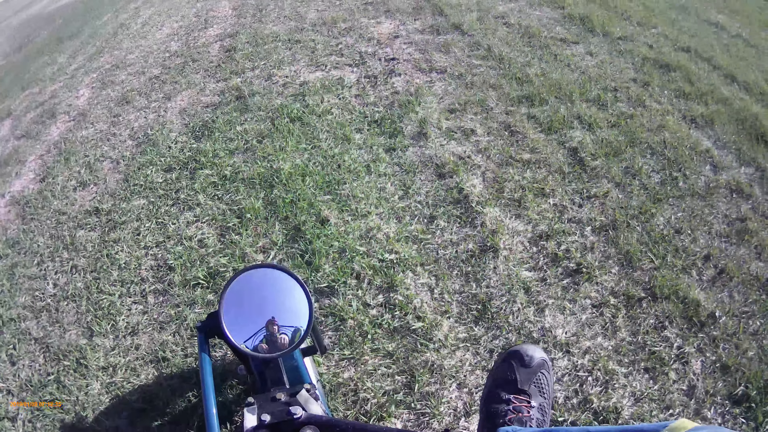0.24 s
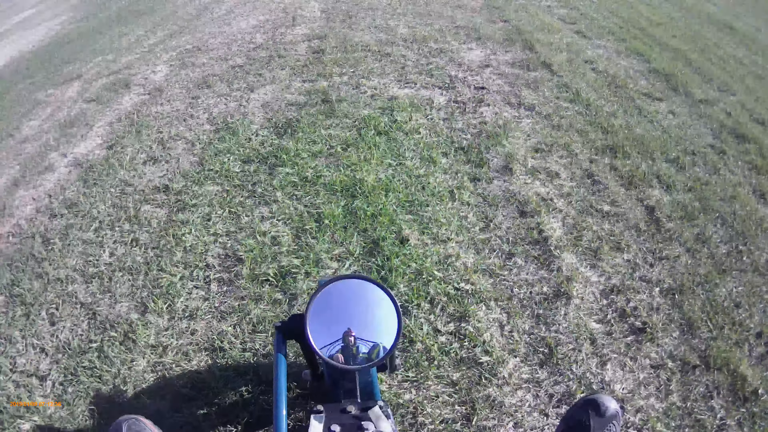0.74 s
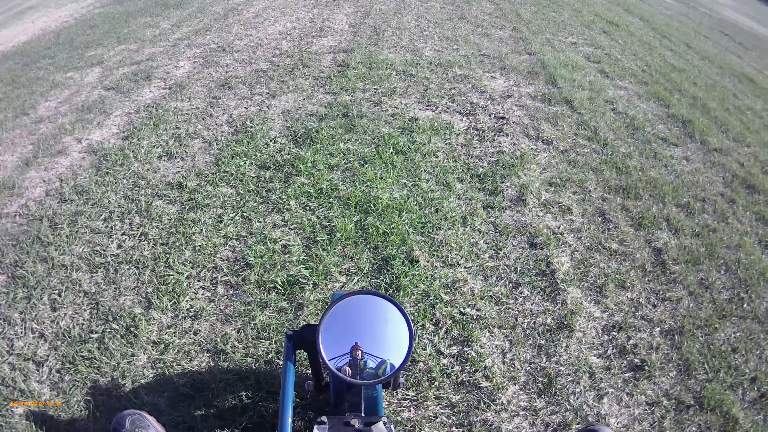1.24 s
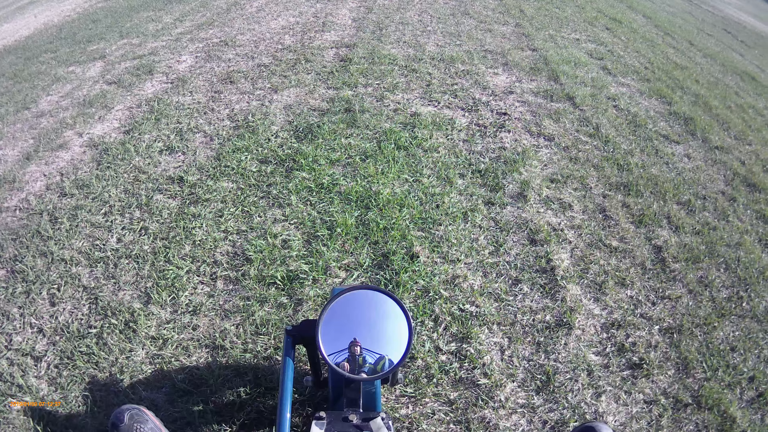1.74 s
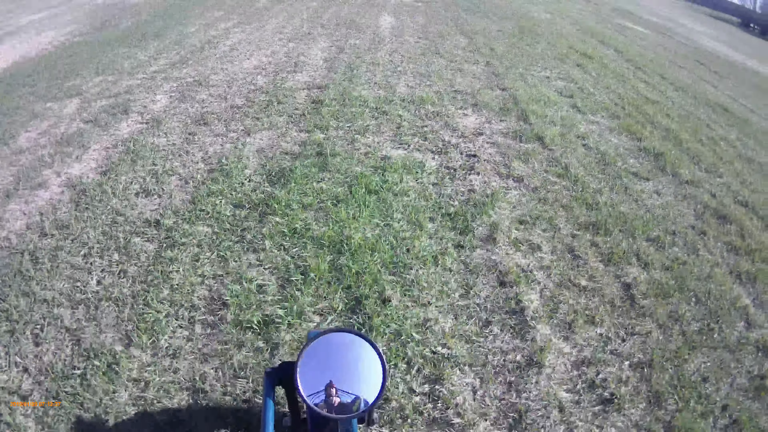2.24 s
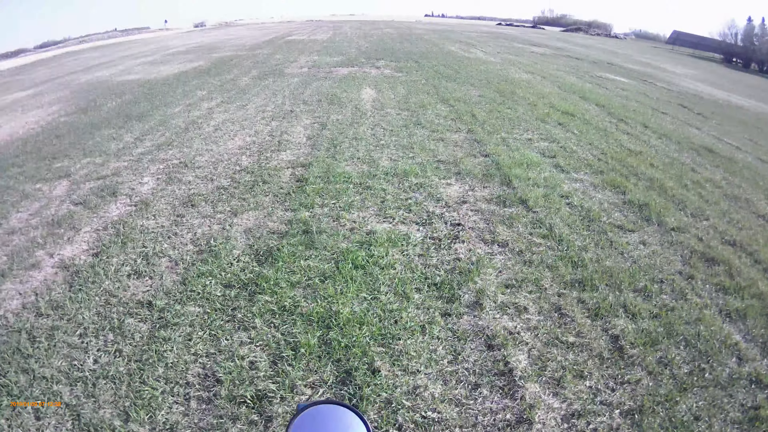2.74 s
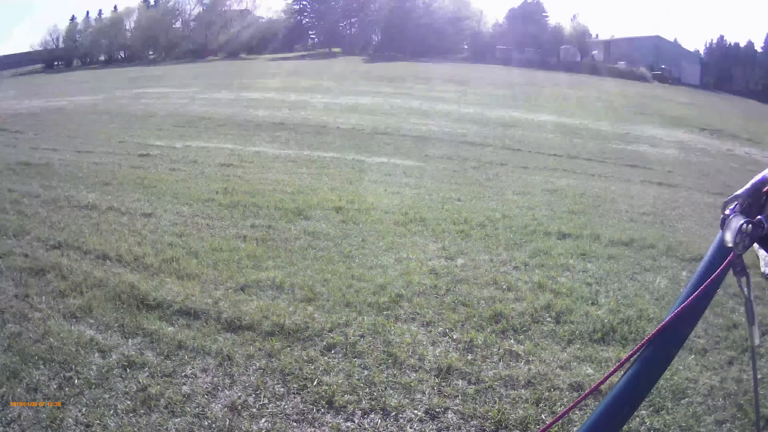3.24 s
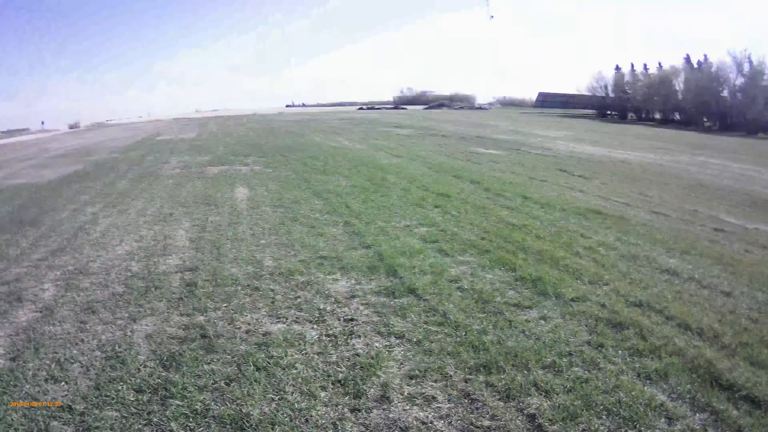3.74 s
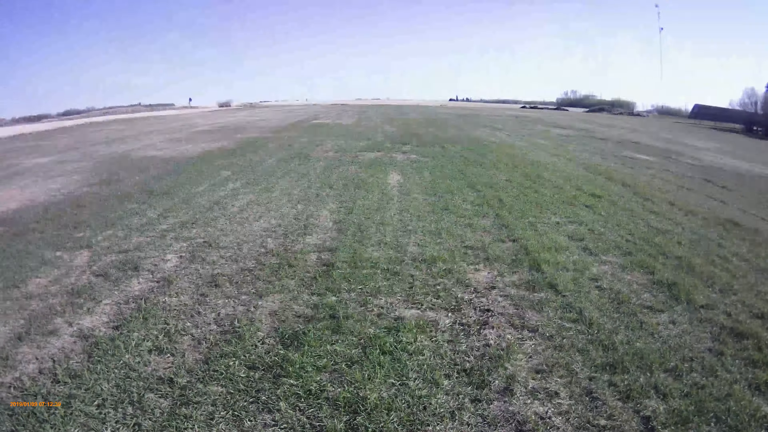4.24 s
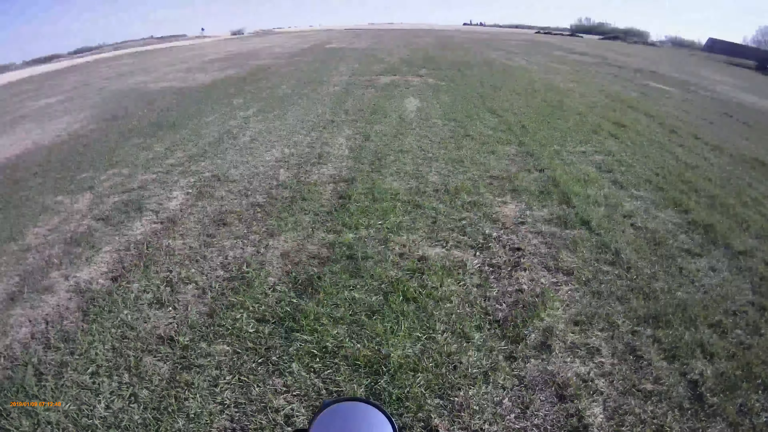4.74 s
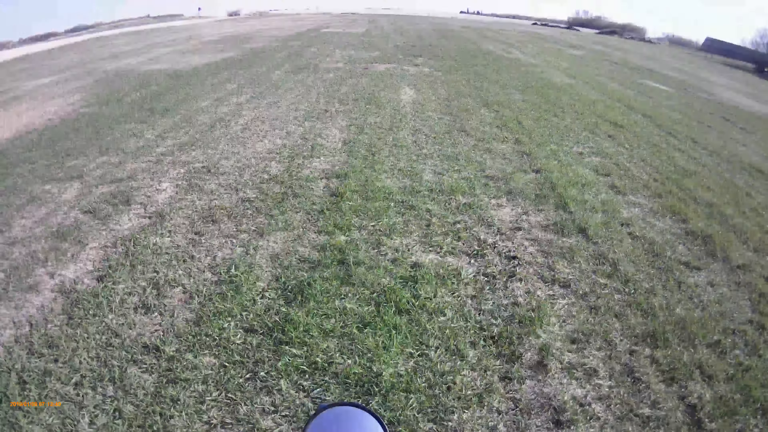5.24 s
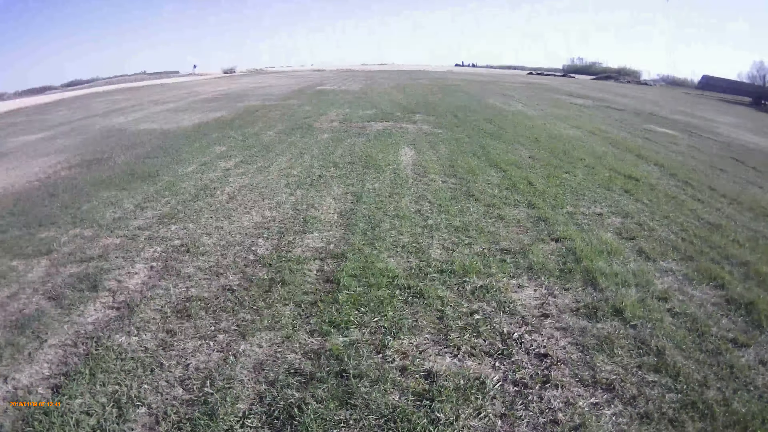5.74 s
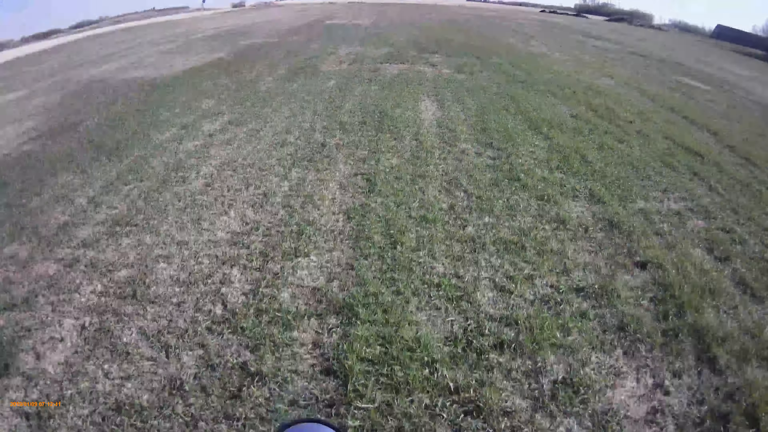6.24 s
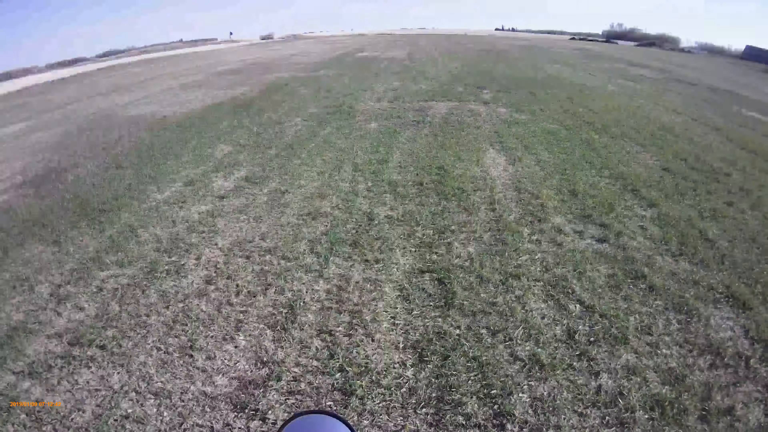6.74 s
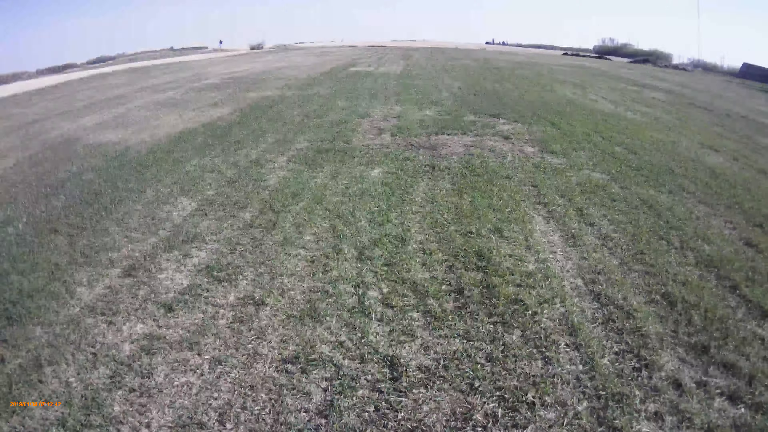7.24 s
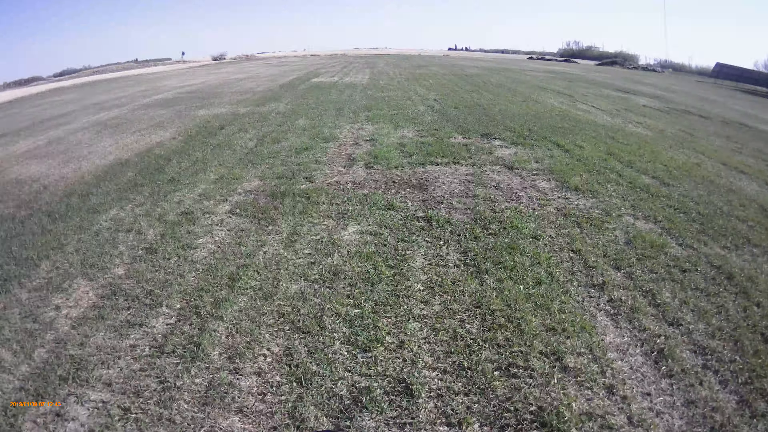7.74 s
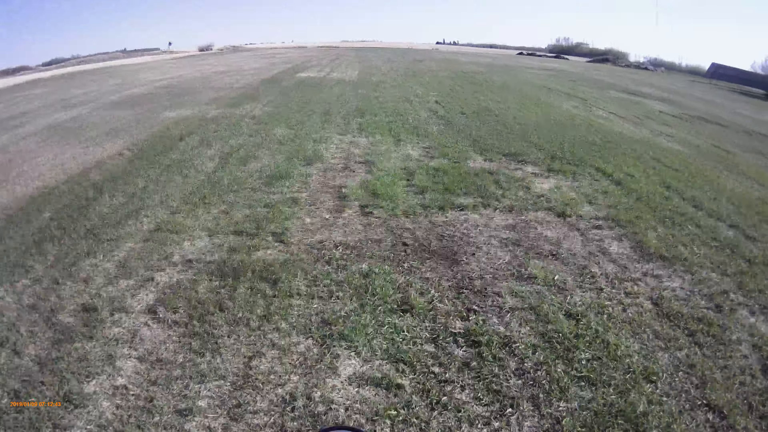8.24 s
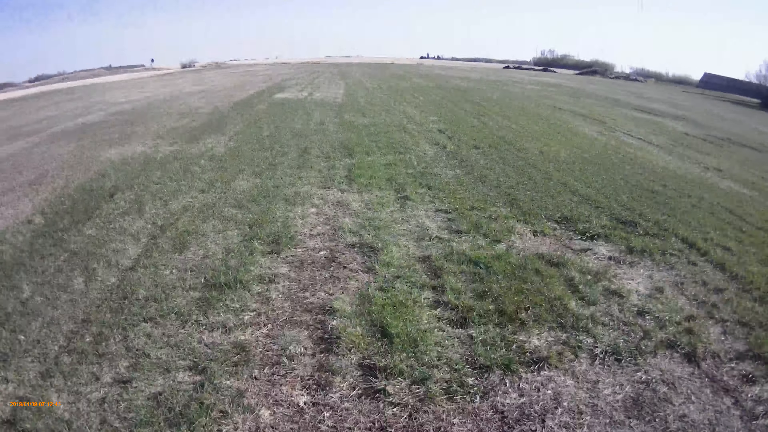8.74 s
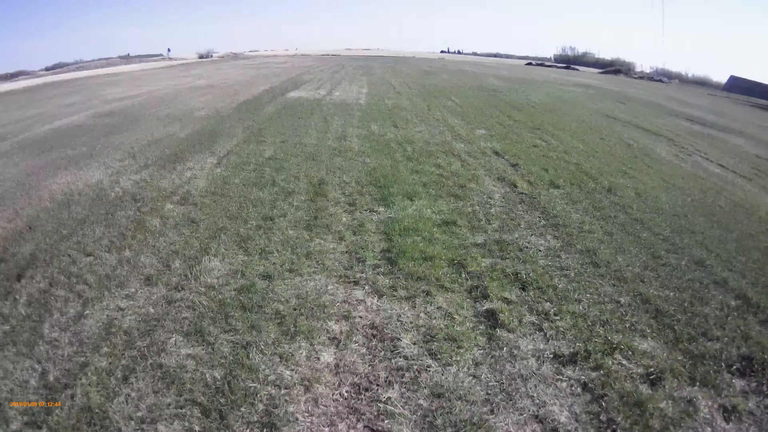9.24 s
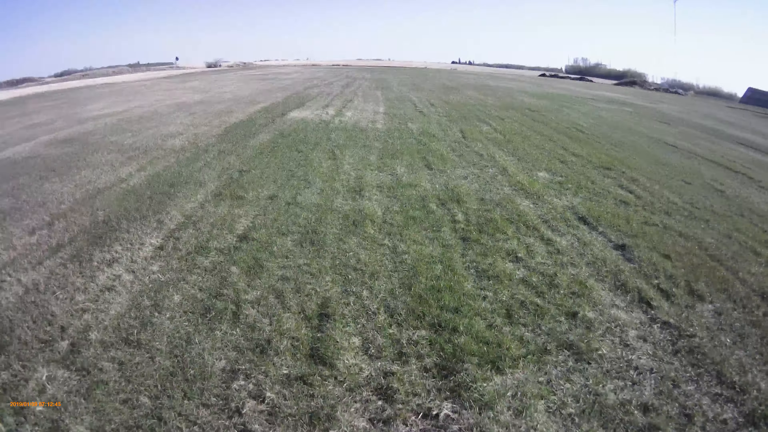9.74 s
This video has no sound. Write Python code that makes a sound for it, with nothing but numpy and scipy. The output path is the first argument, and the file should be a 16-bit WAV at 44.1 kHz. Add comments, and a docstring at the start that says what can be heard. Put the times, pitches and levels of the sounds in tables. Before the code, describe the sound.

A small two-stroke aircraft engine is heard close up from the seat of a powered parachute, outdoors on grass. For the first 2.5 seconds it idles with a lumpy throb and uneven gear clatter, with sharp metallic knocks right at the start and at about 2.2 seconds. Near 2.6 seconds the throttle is nudged: the pitch lifts slightly and the rattle smooths out. From about 3.6 seconds the engine revs up, snarling and growing much louder until it reaches full speed around 5.5 seconds. The exhaust drones, with a rasping propeller buzz and a pulsing hiss of air from the blades. At about 6.2 seconds the engine stumbles, dipping briefly in pitch, then recovers and holds a loud, steady drone until the end, near 10 seconds. A few very faint, dull bumps from the cart rolling over turf lie beneath it between 4 and 7 seconds.

```python
"""A two-stroke twin idles with a rattling gearbox: a powered parachute on a grass strip, heard from the seat.
It is nudged up, then opened to a loud drone that stumbles once. The exhaust sings mostly on the even
shaft orders, a geared three-blade propeller adds its own row of lines, and pulsing gas and blade
noise rings the frame. The cart jolts dully over the turf."""
import sys
import numpy as np
from scipy import signal
from scipy.fft import rfft, irfft, next_fast_len
from scipy.io import wavfile
from scipy.ndimage import uniform_filter1d

SR = 44100
rng = np.random.default_rng(int(sys.argv[2]) if len(sys.argv) > 2 else 0)


def file_out(sig):
    """Save sig as 16-bit WAV at sys.argv[1]."""
    # one column per channel
    cols = np.atleast_2d(sig).T
    # limit, then scale
    lim = np.clip(cols, -1, 1)
    pcm = np.round(lim * 32767).astype(np.int16)
    wavfile.write(sys.argv[1], SR, pcm)


N = 440559
TIME_S = np.arange(N) / SR
FULL_HZ, LOADED_HZ, IDLE_HZ = 100, 37.75, 33.8  # shaft rates: full speed, gears tight, gears slack


def undb(db):
    """Decibels to gain."""
    return 10 ** (np.asarray(db) / 20)


def unit(x):
    """Scale to rms 1."""
    return x / np.sqrt(np.mean(x ** 2))


def curve(table):
    """Straight lines through (seconds, value) rows, one value a sample."""
    return np.interp(TIME_S, *np.transpose(table))


def walk(rate_hz):
    """Smooth random drift, rms near 1."""
    count = int(4 * rate_hz * N / SR) + 8
    points = uniform_filter1d(uniform_filter1d(rng.standard_normal(count), size=4), size=3)
    return np.interp(np.arange(N), np.linspace(0, N, count), unit(points))


def colour(x, points):
    """Ring x through a causal response of (Hz, dB) points; rms 1."""
    hz, db = np.transpose(sorted(points))
    size = 2 * next_fast_len(N // 2 + 4096)
    log_hz = np.log(np.arange(size // 2 + 1) * SR / size + 1)
    magnitude = undb(np.interp(log_hz, np.log(hz), db, left=-70, right=-70))
    cepstrum = irfft(np.log(magnitude))
    response = np.exp(2 * rfft(cepstrum[:size // 2], size))
    return unit(irfft(rfft(x, size) * response)[:N])


def puffs(cycles, decay_cycles, scatter_db):
    """An envelope that jumps to a random height once a cycle, then decays."""
    sizes = undb(scatter_db * np.sqrt(3) * rng.uniform(-2.3, 1, size=4096))
    return unit(sizes[cycles.astype(int) % len(sizes)] * np.exp(-(cycles % 1) / decay_cycles))


def line(cycles, flutter, spread=1):
    """A partial, rms near 1, fluttering in the moving air; spread is its start phase range in cycles."""
    angle = 2 * np.pi * (cycles + spread * (rng.random() - .5)) + flutter * walk(11)
    return np.sqrt(2 / (1 + flutter ** 2)) * (1 + flutter * walk(11)) * np.sin(angle)


def harmonics(table, cycles, mid_revs, rolled_s, flutter, spread):
    """Exact multiples whose balance shifts at mid revs and as the cart rolls on."""
    return sum(undb(db + mid_db * mid_revs + db_per_s * rolled_s)
               * line(round(order) * cycles, flutter, spread)
               for order, db, mid_db, db_per_s in table)


# Each row: centre in seconds, half length in seconds, level in dB.
TURF_JOLTS = [(4.058, .09, -63), (4.364, 0.14, -63), (6.101, 0.019, -58), (7.221, 0.08, -67)]

def turf_jolts():
    """Each bump shakes a short swell of low rumble out of the cart."""
    swell = sum(undb(db) * np.exp(-((TIME_S - s) / half_s) ** 2) for s, half_s, db in TURF_JOLTS)
    return swell * colour(rng.standard_normal(N), [(20, -18), (48, -1), (75, -5), (160, -28)])


def rush(turns, passes, firing_share, blade_share):
    """Turbulence: a share pulses with each firing, a share swells and cracks with each passing blade."""
    speed = np.gradient(turns) * SR / FULL_HZ
    firing = puffs(2 * turns, decay_cycles=0.4, scatter_db=1.5)
    from_blade = np.abs((passes + .5) % 1 - .5)
    crack = 0.23 * puffs(passes, decay_cycles=0.13, scatter_db=4.5)
    blade = unit(np.exp(-from_blade / .3) + crack)
    firing_power = firing_share * (1.7 - speed) * (firing ** 2 - 1)
    blade_power = blade_share * speed ** 2 * (blade ** 2 - 1)
    return np.sqrt(np.abs(1 + firing_power + blade_power)) * rng.standard_normal(N)


# Each row: frequency in Hz, relative gain in dB.
CASING_RESPONSE = [(1000, -19.5), (1280, 6), (1450, -18), (1900, -13), (2100, 0.5), (2400, -18.5),
                   (2800, -28), (3250, -6.5), (3600, -24.5), (3900, -10), (4300, -20), (4700, -34.5),
                   (9000, -34)]

def casing_ring(turns, passes):
    """Turbulence rings the engine casing behind the seat."""
    return undb(-50) * colour(rush(turns, passes, firing_share=0.38, blade_share=.05), CASING_RESPONSE)


# Each row: centre in seconds, rise in dB.
GEAR_CLACKS = [(.052, 2.5), (.11, 4), (.187, 2), (.263, 4.5), (.33, 1.5), (.382, 0.5), (.44, 1), (.505, 3),
               (.575, 3), (.645, 3.5), (.7, 4), (.762, 5), (.827, 3.5), (.912, 3.5), (.987, 4), (1.052, 3),
               (1.122, 2.5), (1.18, 3.5), (1.234, 2.5), (1.3, 3.5), (1.357, 2), (1.46, 2.5), (1.522, 3.5),
               (1.598, 3.5), (1.656, 0.5), (1.733, 3.5), (1.797, 3), (1.862, 3), (1.913, 4), (1.982, 3.5),
               (2.043, 1.5), (2.094, 5), (2.15, 4.5), (2.216, 5), (2.287, 3), (2.343, 3), (2.415, 4),
               (2.475, 4.5), (2.541, 4)]

def gear_clacks_db(half_s=0.012):
    """At idle the propeller rocks unevenly against the gear teeth; the clatter swells each time."""
    return sum(db * np.exp(-np.minimum(np.abs(TIME_S - s) / half_s, 10) ** 2) for s, db in GEAR_CLACKS)


# Each row: start in seconds, level in dB.
GEAR_SLAMS = [(.055, -46), (2.193, -49), (2.403, -58)]
# Each row: frequency in Hz, relative gain in dB.
SLAM_RESPONSE = [(700, -20), (1300, 1), (1700, 5), (2200, -5), (2800, -18), (3300, 1), (3900, -9),
                 (4600, -26), (10500, -38)]

def gear_slams(decay_s=0.0078):
    """Gear teeth slam: a sharp, bright knock that dies quickly."""
    blows = sum(undb(db) * (TIME_S > s) * np.exp(-np.minimum(np.abs(TIME_S - s) / decay_s, 20))
                for s, db in GEAR_SLAMS)
    return blows * colour(rng.standard_normal(N), SLAM_RESPONSE)


# Each row: frequency in Hz, relative gain in dB.
RATTLE_RESPONSE = [(25, -35), (48, -3), (100, -1.5), (160, -2.5), (205, 8.5), (310, -0.5), (420, 0.5),
                   (700, -8), (1100, -6), (1330, 0.5), (1720, -3.5), (1950, -22.5), (2750, -34),
                   (3250, -18), (3850, -17), (4400, -29.5), (10000, -34)]

def gear_rattle(turns):
    """Steady gear clatter with a piston pulse once a firing."""
    envelope = 1.1 + puffs(2 * turns, decay_cycles=0.97, scatter_db=1.0)
    return undb(-54.5) * colour(envelope * rng.standard_normal(N), RATTLE_RESPONSE)


# Each row: frequency in Hz, relative level in dB, t60 in seconds.
CYLINDER_MODES = [(1335, 2.5, 0.042), (1530, 3, .025), (1700, -1, 0.036), (3310, -5.5, 0.02),
                  (3800, -7.5, .015)]

def piston_knocks(turns, idling, clack_db, scatter_db=2.5, attack_s=.0012):
    """At idle each firing slaps a piston against its bore and rings the cylinders, harder in a clack."""
    firings = np.diff(np.floor(2 * turns), prepend=0)
    blows = firings * idling * undb(2.4 * clack_db + scatter_db * rng.uniform(-1, 1, N))
    t = np.arange(SR // 10) / SR
    ring = sum(undb(db - 60 * t / t60) * np.sin(2 * np.pi * hz * t) for hz, db, t60 in CYLINDER_MODES)
    ring *= 1 - np.exp(-t / attack_s)
    return undb(-66) * unit(signal.fftconvolve(blows, ring)[:N])


def idle_throb(idling, clack_db, boom_hz=210):
    """Lumpy idle firings boom in the pipe, in step with the clacks."""
    return idling * undb(-69 + 2 * clack_db) * line(boom_hz * TIME_S, flutter=0.95)


# Four noise bands, low to high. Each row: frequency in Hz, relative gain in dB.
RUMBLE_BAND = [(25, -42), (48, -33.5), (85, -44), (150, -17), (215, -4.5), (280, -12.5), (350, -3),
               (430, 2), (510, -2.5), (680, -4), (850, -2.5), (1050, 0.5), (1500, -42)]
ROAR_BAND = [(600, -36), (850, -19.5), (1020, -6.5), (1130, -8), (1300, 1), (1430, -0.5), (1720, 0),
             (1850, -5), (1980, -8.5), (2120, -1.5), (2250, -7.5), (2420, -14), (2780, -28), (3600, -50.5)]
HISS_BAND = [(2300, -39), (2830, -13), (3200, 1.5), (3650, 0.5), (4050, -6), (4300, -10.5), (4550, -12),
             (5200, -35.5), (7000, -52.5)]
AIR_BAND = [(3000, -34.5), (4200, -9.5), (4550, 1.5), (4900, 1.5), (5150, 1.5), (5400, 1.5), (5650, 1.5),
            (6500, -3.5), (7900, -7.5), (9000, -19), (9800, -13), (11000, -29.5)]

def turbulence(turns, passes, gain, sideways):
    """Gas and blade noise; the top band rises while the head faces sideways."""
    rumble = colour(rush(turns, passes, firing_share=0.086, blade_share=0.081), RUMBLE_BAND)
    roar = colour(rush(turns, passes, firing_share=0.2, blade_share=0.43), ROAR_BAND)
    hiss = colour(rush(turns, passes, firing_share=0.21, blade_share=0.24), HISS_BAND)
    air = colour(rush(turns, passes, firing_share=.05, blade_share=0.23), AIR_BAND)
    air *= undb(8.5 * sideways)
    return gain["rumble"] * rumble + gain["roar"] * roar + gain["hiss"] * hiss + gain["air"] * air


# Each row: frequency in Hz, relative gain in dB.
FRAME_RESPONSE = [(30, -48), (60, -40), (120, -6), (230, 2.5), (300, -8), (440, 4.5), (540, -6.5),
                  (750, -8.5), (1020, -4), (1300, 0), (1750, -0.5), (1950, -10.5), (2120, -5),
                  (2800, -35.5)]

def frame(lines):
    """Resonances of frame and seat, which the lines glide through."""
    return colour(lines, FRAME_RESPONSE)


# Each row: multiple of the blade rate, relative level in dB, dB added at mid revs, dB per second rolled.
PROPELLER_LINES = [(1, -7.5, -5, 1), (2, -12.5, 5, 1), (3, -11, 7, 2.5), (5, 0, -0.5, 0), (6, -0.5, 2.5, 1),
                   (7, 2.5, -0.5, 1.5), (8, -1.5, -2.5, 0.5), (9, -2, -1, 1), (10, 2.5, -6, 0),
                   (11, 6, -7.5, .3), (12, 1, 1, -2), (13, 0.5, -1, -1), (14, -3.5, 5, 1),
                   (15, 4.5, -0.5, -0.7), (16, 0, 4.5, 0.5), (17, 1.5, 5.5, -1), (18, 3.5, -0.5, -0.5),
                   (19, -6, 11.5, 0.5), (20, 4.5, 2, -4.5)]

def propeller(passes, mid_revs, rolled_s):
    """Blades slap the disturbed air behind the frame; the lines keep in step as a rasping pulse."""
    return frame(harmonics(PROPELLER_LINES, passes, mid_revs, rolled_s, flutter=0.1, spread=0.53))


def blade_beat(passes, speed_db, since_stumble_s, stumble):
    """The fourth blade line beats against the exhaust note and grows as the cart rolls on."""
    level_db = -42 + 3.5 * speed_db + 1.74 * since_stumble_s - 21 * stumble
    return undb(level_db) * line(4 * passes, flutter=0.31)


# Each row: shaft order, relative level in dB, dB added at mid revs, dB per second rolled.
BUZZ_LINES = [(1, -8.5, 2, 0.5), (5, -6.5, 8, -1), (7, -3, 2.5, -0.5), (9, 1, -2, -0.5), (10, 3, -0.5, 0.5),
              (11, -8, 4, 1.5), (12, -11.5, 14, 1.5), (13, -1, 0, 1.45), (15, -0.5, 2, .5),
              (16, -3.5, 6.5, 1), (17, -6.5, 0, 1.5), (18, -3.5, -3, 2), (19, 5.5, -9, -1.5),
              (20, -4, 2.5, 3), (21, -3, 4.5, 1.5), (22, 0.5, 2, 0), (23, -3, 4.5, 1)]

def engine_buzz(turns, mid_revs, rolled_s, stumble):
    """The sharp edge of the firings: weaker shaft orders, dipping as firings miss in the stumble."""
    lower = harmonics(BUZZ_LINES, turns, mid_revs, rolled_s, flutter=0.12, spread=1)
    upper = sum(line(order * turns, flutter=.45) for order in range(24, 38, 2))
    return undb(-5 * stumble) * frame(lower + undb(2.5) * upper)


# Each row: frequency in Hz, gain in dB.
PIPE_RESPONSE = [(60, 0), (100, -2), (122, 4), (140, -2.5), (158, -7), (200, -0.94), (212, 2), (246, 9),
                 (272, -0.5), (290, -2), (304, 5.5), (316, 6), (330, 3), (350, 6.5), (392, 11), (404, 11.5),
                 (432, 12.5), (460, 11), (505, -2.5), (545, 0.5), (600, -3.5), (690, -9), (770, -0.3)]
# Each row: shaft order, drive in dB at full speed, dB per dB of speed, dB added at mid revs,
# stumble dip in dB, flutter 0-1, stagger 0-1 (extra flutter at idle and in the stumble).
EXHAUST_LINES = [(2, -35, 4, -0.5, 1.5, 0.01, 0.01), (3, -58.5, 4.5, 15.5, -6.5, 0.37, 0.1),
                 (4, -41, 2, -3.5, 13, 0.01, 0), (6, -40.5, 2.5, 1.5, 10, 0.09, 0.46),
                 (8, -44.5, 2.27, 0, 15, 0.13, 0.75), (14, -44.5, 3, 2, 3, .15, 1)]

def exhaust(turns, shaft_hz, speed_db, idling, mid_revs, stumble, stagger_loss_db=9.5):
    """Two firings a turn: orders swell as they cross the pipe's resonances; upper ones stagger at idle."""
    pipe_hz, pipe_db = np.transpose(sorted(PIPE_RESPONSE))
    note = 0
    for order, db, rise, mid_db, dip_db, flutter, stagger in EXHAUST_LINES:
        order = round(order)
        ring_db = np.interp(order * shaft_hz, pipe_hz, pipe_db)
        drive_db = db + rise * speed_db + mid_db * mid_revs
        loss_db = dip_db * stumble + stagger_loss_db * stagger * idling
        partial = line(order * turns, flutter + stagger * (idling + stumble))
        note += undb(drive_db - loss_db + ring_db) * partial
    return note


# Each row: time in seconds, crankshaft rate in Hz.
SHAFT_RATE = [(.1, 34.15), (.7, 33.6), (1.6, 32.88), (2.2, 33.7), (2.55, 33.5), (2.8, 38.7), (2.95, 39.06),
              (3.57, 38.63), (3.7, 43.38), (4, 55.14), (4.35, 68.7), (4.7, 80.16), (5, 90.34),
              (5.12, 93.94), (5.25, 95.87), (5.4, 97.7), (5.75, 99.1), (6.07, 99.7), (6.2, 96), (6.4, 95.7),
              (6.55, 97.34), (6.9, 98.74), (7.4, 100.1), (7.7, 99.4), (8.55, 100.2), (9.2, 99.9), (9.9, 99)]
# Work beyond what the speed needs. Each row: time in seconds, effort in dB, dB added to the exhaust.
ENGINE_EFFORT = [(0, 2, 1.5), (2.45, 3, 1.5), (2.58, 7, 1), (2.76, 2.5, 5), (2.88, 0, 2), (3.45, -1, 1.5),
                 (3.62, 1, 1.5), (3.95, 0.5, 3), (4.17, 1.5, -1.5), (4.42, 0.5, 1.5), (5.1, 0.5, 2),
                 (5.7, 2.5, 2.8), (6.1, 2.14, -0.5), (6.55, 2.26, 2), (7.1, 1.5, -1.5), (7.7, 0.44, 0.3),
                 (8.2, 0.5, 0.5), (9.1, 0, -0.5), (9.9, 0.5, 1)]
# Each row: time in seconds, how far the head faces sideways 0-1.
HEAD_TURN = [(2.9, 0.07), (3.2, 0.87), (3.6, 1), (3.85, 0.02)]
# Each entry, by layer: base dB at full speed, dB per dB of speed, dB per dB of effort, dB added at idle.
LAYER_LEVELS = {"rumble": (-36.5, 2.5, 0.15, 1), "roar": (-29.5, 2.5, 1.39, -6),
                "hiss": (-41, 3, 1.2, -2.8), "air": (-50.5, 3, 0.8, -0.7), "buzz": (-31.5, 3, 1, -7.5),
                "blades": (-31, 3.5, 1.5, -6.5)}
STUMBLE_S, STUMBLE_HALF_S, SETTLE_S = 6.2, 0.125, 3.5
MID_REVS_HZ, MID_REVS_WIDTH_HZ = 77.25, 18.55  # the engine snarls here, with less noise

def scene(blade_count=3, gear_ratio=2.579):
    """Shaft speed times the engine and propeller and, with effort, sets their levels."""
    shaft_hz = curve(SHAFT_RATE)
    effort_db = curve([(s, db) for s, db, _ in ENGINE_EFFORT])
    note_db = curve([(s, db) for s, _, db in ENGINE_EFFORT])
    sideways = curve(HEAD_TURN)
    since_stumble_s = TIME_S - STUMBLE_S
    stumble = np.exp(-(since_stumble_s / STUMBLE_HALF_S) ** 4)
    rolled_s = np.clip(since_stumble_s, 0, SETTLE_S)
    turns = np.cumsum(shaft_hz * (1 + 0.00048 * walk(16))) / SR
    passes = turns * blade_count / gear_ratio
    speed_db = 20 * np.log10(shaft_hz / FULL_HZ)
    idling = np.clip((LOADED_HZ - shaft_hz) / (LOADED_HZ - IDLE_HZ), 0, 1)
    mid_revs = np.exp(-((shaft_hz - MID_REVS_HZ) / MID_REVS_WIDTH_HZ) ** 2)
    clack_db = gear_clacks_db()
    gain = {name: undb(db + rise * speed_db + push * effort_db + idle_db * idling)
            for name, (db, rise, push, idle_db) in LAYER_LEVELS.items()}

    noise = turbulence(turns, passes, gain, sideways) + gear_rattle(turns)
    noise *= undb(clack_db - 2 * idling - 0.95 * mid_revs)
    note = undb(note_db) * exhaust(turns, shaft_hz, speed_db, idling, mid_revs, stumble)
    blades = gain["blades"] * propeller(passes, mid_revs, rolled_s)
    blades += blade_beat(passes, speed_db, since_stumble_s, stumble)
    buzz = gain["buzz"] * engine_buzz(turns, mid_revs, rolled_s, stumble)
    idle = idle_throb(idling, clack_db) + piston_knocks(turns, idling, clack_db)
    casing = sideways * casing_ring(turns, passes)
    return turf_jolts() + casing + gear_slams() + idle + noise + blades + buzz + note


def record(dry, cutoff_hz=10500):
    """Mono, with a steep low-pass."""
    return signal.sosfilt(signal.ellip(8, .2, 70, cutoff_hz, fs=SR, output="sos"), dry)


dry = scene()
out = record(dry)
file_out(out)
```